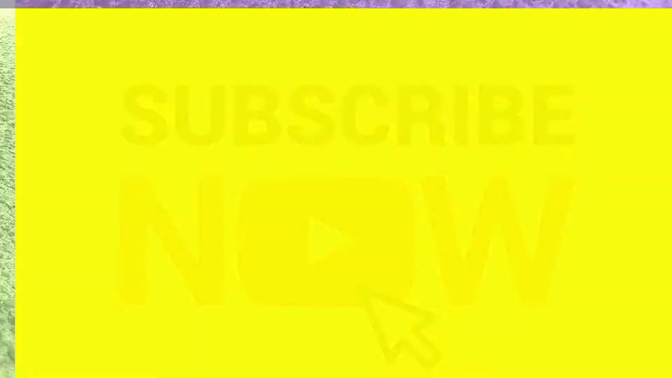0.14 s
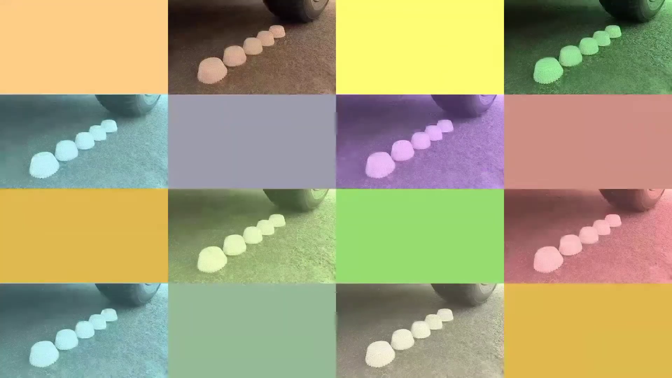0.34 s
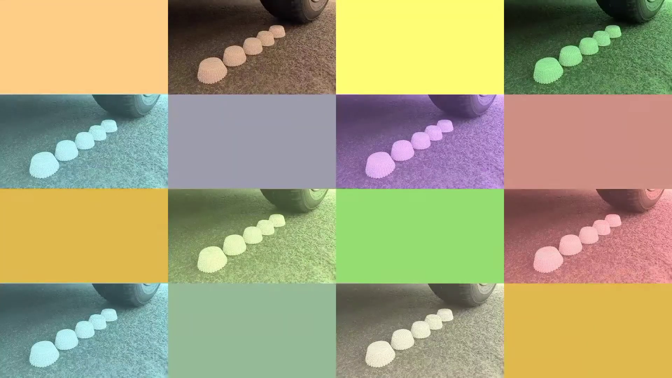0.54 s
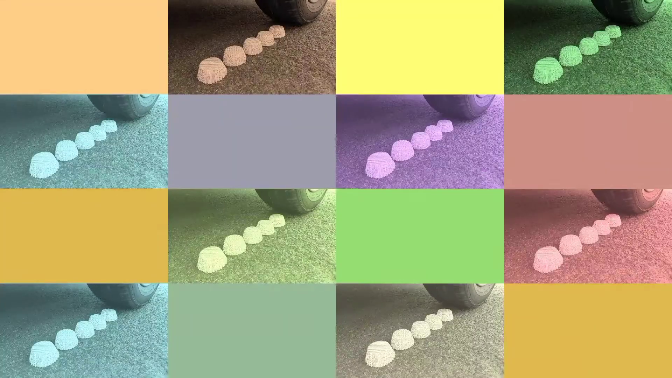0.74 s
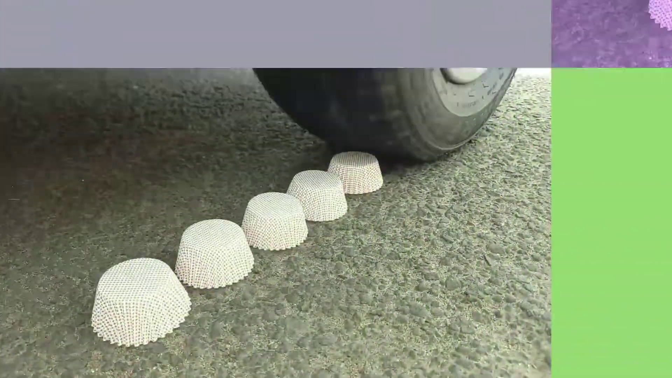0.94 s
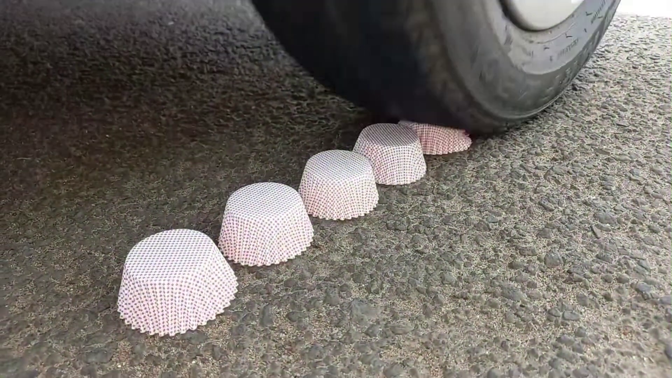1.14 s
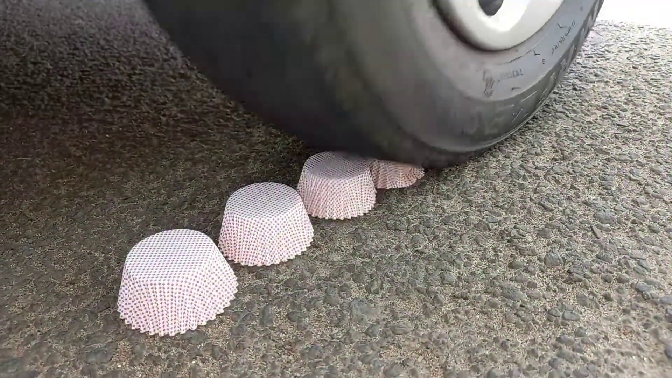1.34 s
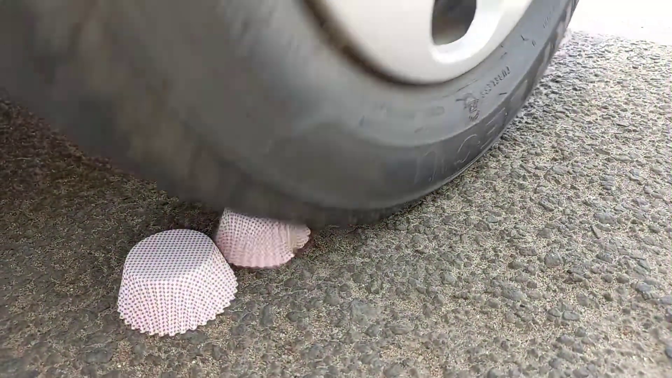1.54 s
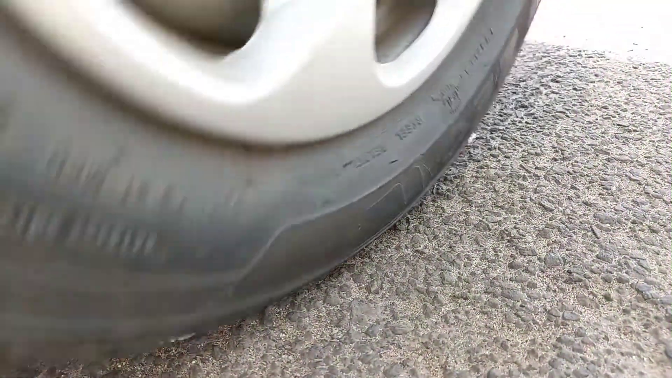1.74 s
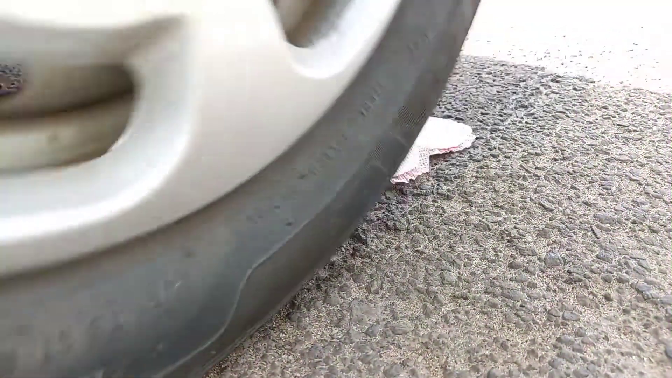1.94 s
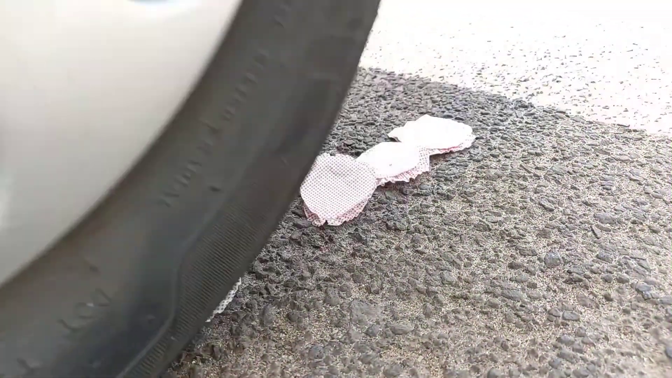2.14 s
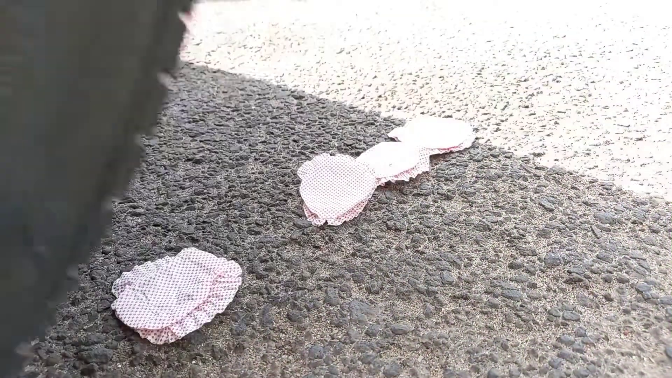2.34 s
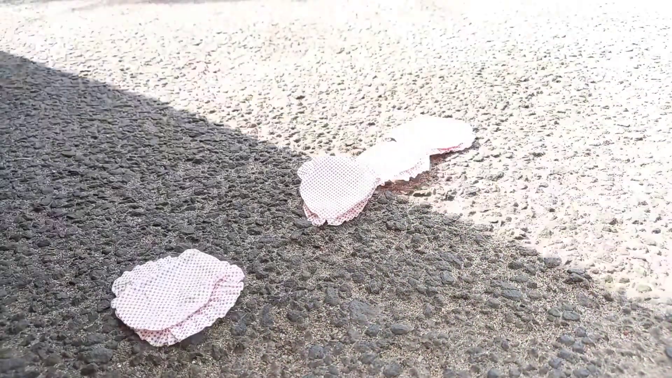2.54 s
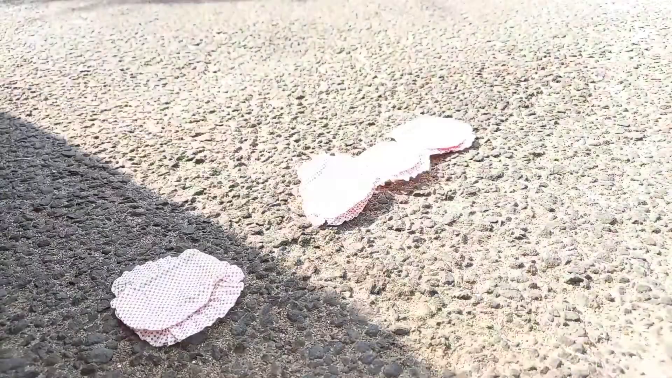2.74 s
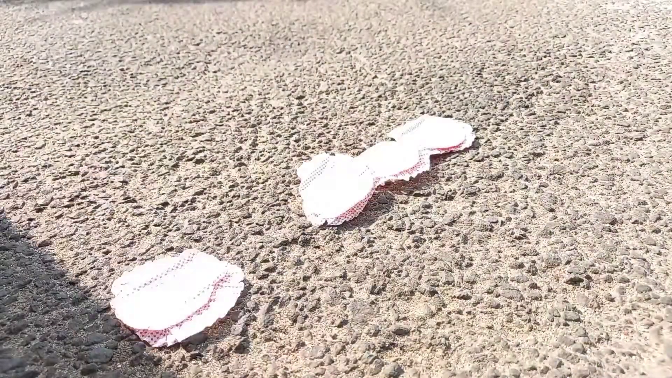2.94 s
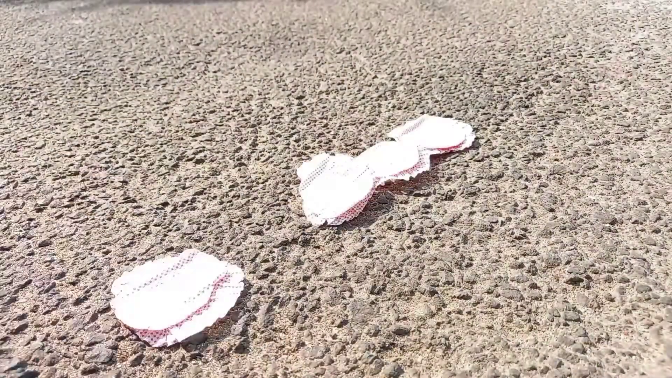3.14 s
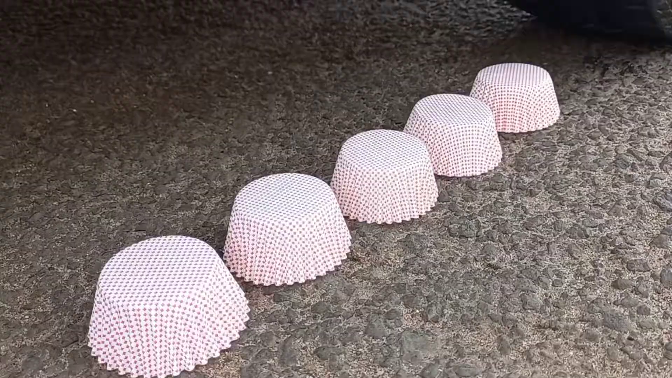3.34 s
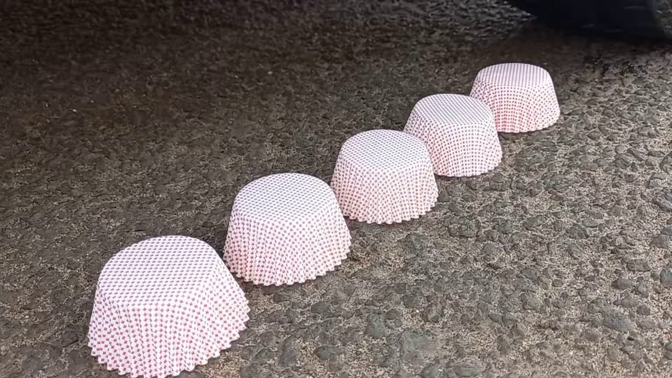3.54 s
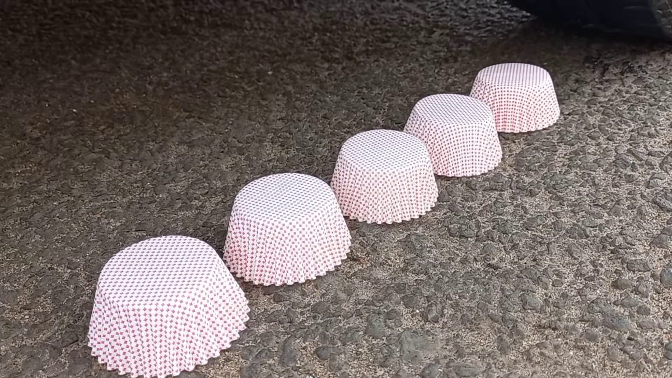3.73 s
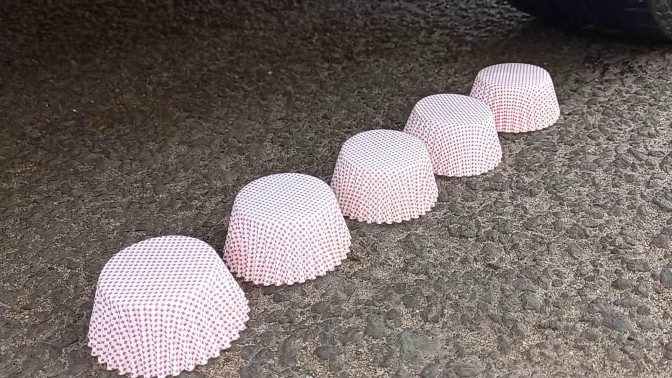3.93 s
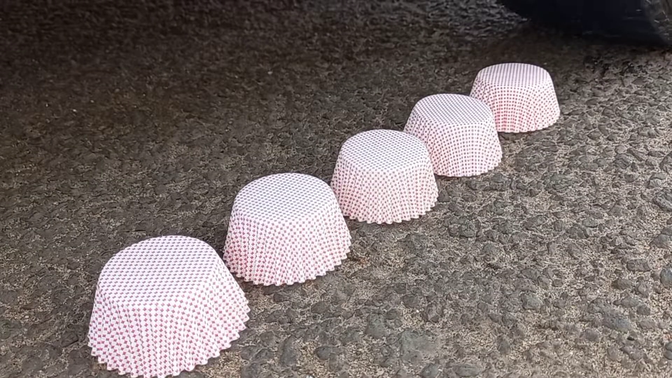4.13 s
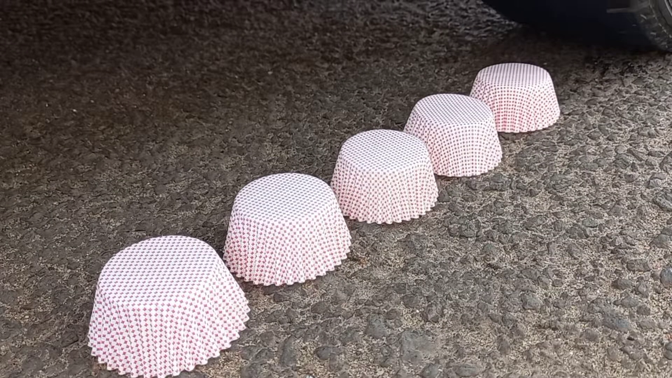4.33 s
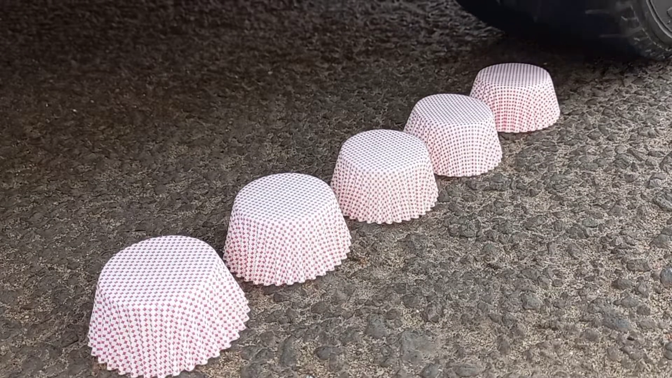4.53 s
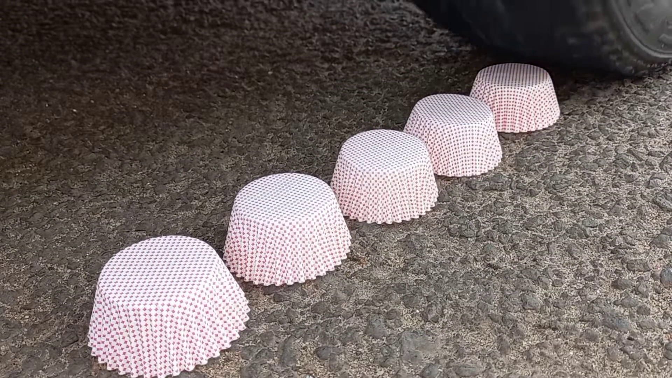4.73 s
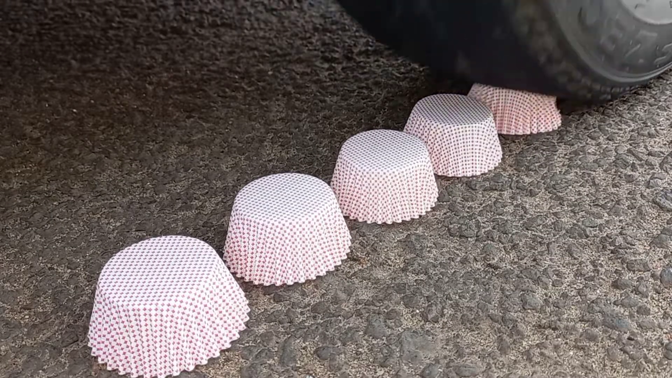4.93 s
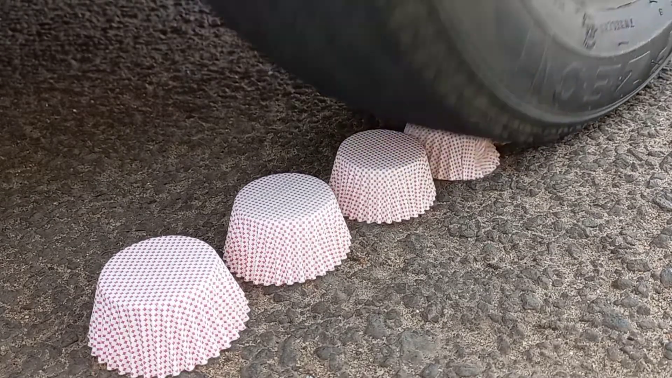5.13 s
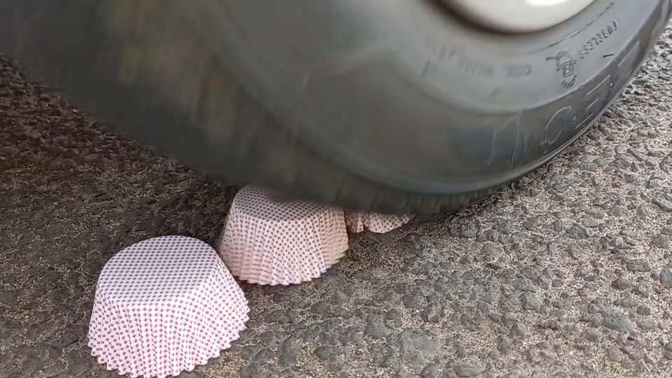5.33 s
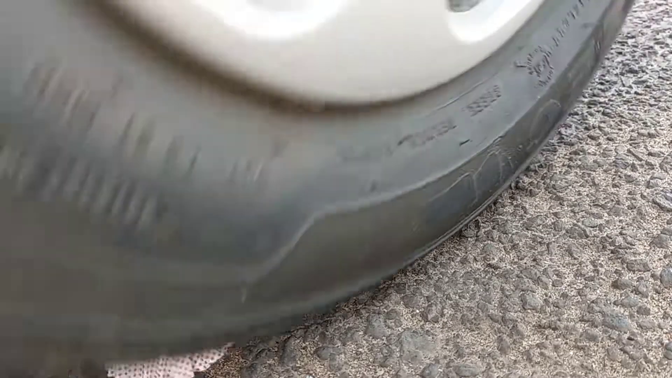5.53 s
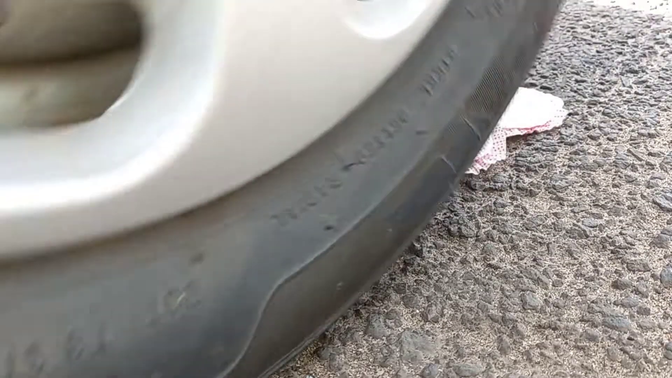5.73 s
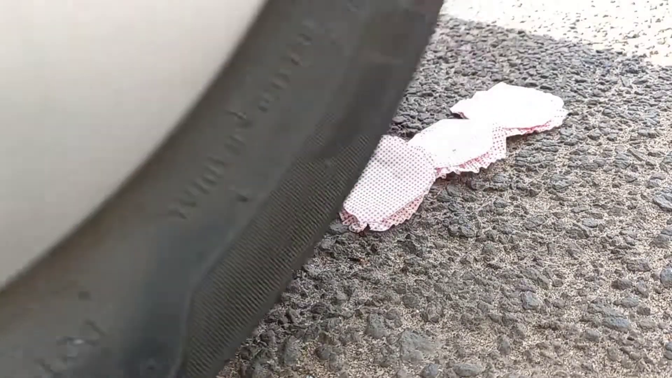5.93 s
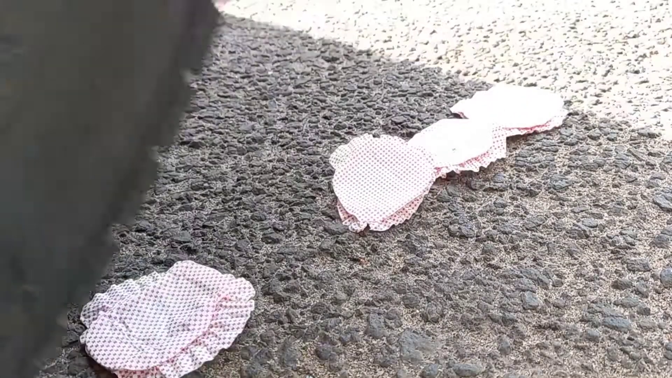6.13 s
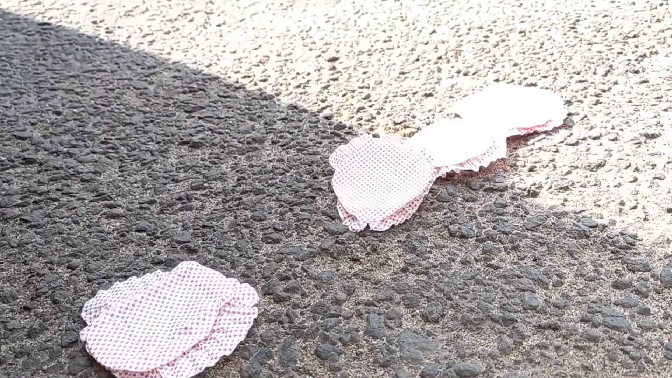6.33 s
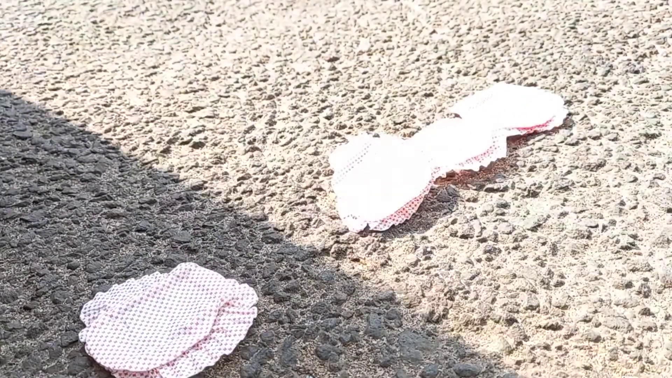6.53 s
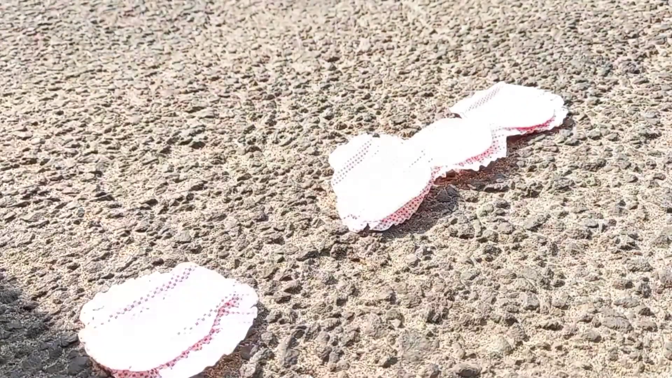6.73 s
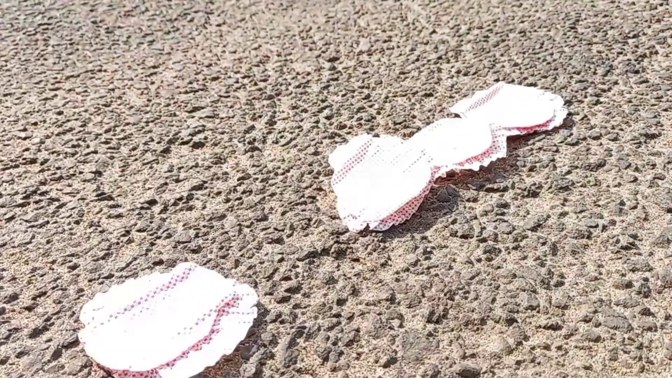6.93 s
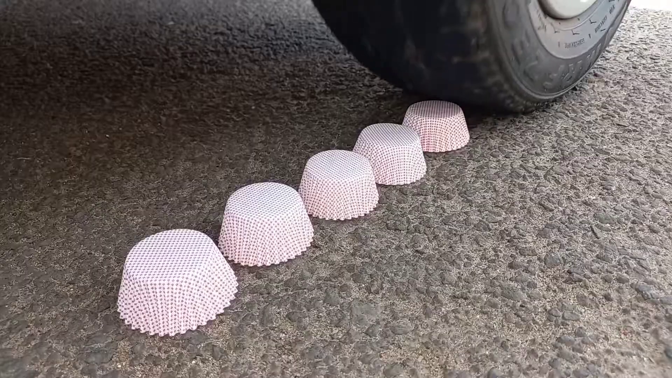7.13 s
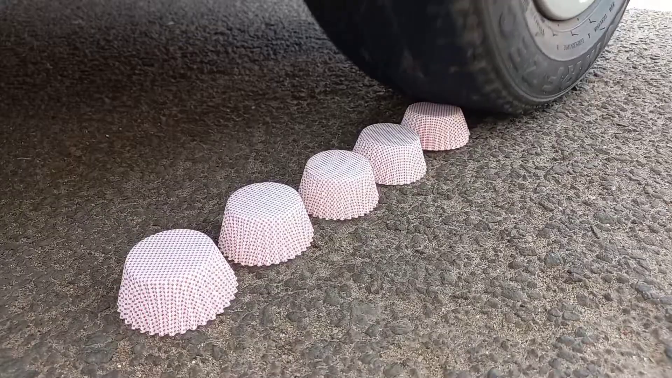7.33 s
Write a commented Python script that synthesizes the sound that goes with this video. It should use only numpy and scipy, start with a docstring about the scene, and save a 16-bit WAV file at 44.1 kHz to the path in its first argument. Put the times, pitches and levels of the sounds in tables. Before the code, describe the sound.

A creeping car flattens pleated paper cups, heard very near and dry outdoors. Sharp snaps and fibrous crackles pile up for under a second, with a dull thud inside, then grit pops sparsely as the wheel rolls off. After small thumps, a clack and a weak squeak, the crushing repeats, louder at its start. It ends abruptly quieter, with light paper ticks and low hum.

```python
"""Paper cupcake liners, five in a row on asphalt, buckle and crumple under a creeping car, heard close by.
Elastic instability makes the snaps: each pleat flips, its panel rings and its crease cracks, while
fracturing fibres excite the resonances of the paper. Grit ticks by noise bursts; the car knocks as damped
modes and filtered noise, squeaks faintly, and rolls as filtered noise with an engine hum.
The pass is heard twice, the first time fading in; then the tyre touches a fresh row."""
import sys
import numpy as np
from scipy import signal
from scipy.fft import rfft, irfft
from scipy.io import wavfile
from scipy.ndimage import map_coordinates

SR = 44100
rng = np.random.default_rng(int(sys.argv[2]) if len(sys.argv) > 2 else 0)


def output_pcm(signal):
    """Save a mono or channel-first signal as 16-bit PCM at the path in sys.argv[1].

    Samples are clipped to [-1, 1] before scaling.
    """
    pcm = np.clip(np.atleast_2d(signal).T, -1, 1) * 32767
    wavfile.write(sys.argv[1], SR, np.round(pcm).astype(np.int16))


N = 325017
TIME = np.arange(N) / SR

# Times in the tables precede the repetition in scene(); levels are relative, ahead of later gains.
# Rolling of the car: (time [s], rumble level [dB], tread hiss level [dB])
ROLLING_LEVELS = [(3.2, -59, -64), (3.6, -61.5, -69), (4.15, -62.5, -69), (4.7, -60.5, -63.5),
                  (5.3, -54.5, -70), (6.05, -54, -69), (6.3, -61, -66), (6.7, -62, -67), (7.01, -55.5, -71),
                  (7.03, -76, -81), (7.17, -70, -70), (7.37, -67, -69)]
# Engine hum, plainest as the car starts on the fresh row: (time [s], level [dB])
HUM_LEVELS = [(3.2, -69), (5.3, -63), (7.0, -68), (7.03, -83), (7.18, -59), (7.37, -61)]
# Faint squeaks of the running gear: (time [s], length [s], mid frequency [Hz], level [dB])
SQUEAKS = [(3.394, 0.26, 1644, -63.5), (4.01, 0.36, 1626, -73.5), (4.48, .38, 1308, -71),
           (7.03, .317, 1960, -78)]
# Soft knocks and scuffs:
# (time [s], boom level [dB], hollow body level [dB], rattle level [dB], shudder decay T60 [s])
KNOCKS = [(3.286, -50, -59.5, -64.5, 0.75), (3.327, -45, -43, -39, 0.011), (3.354, -66, -45.5, -55.5, 0.2),
          (3.378, -35, -47.5, -43, 0.15), (3.459, -41, -63, -60, 0.17), (3.759, -45, -77, -77, 0.23),
          (4.198, -46, -82.5, -85, .1), (4.289, -55, -39, -79, 0.2), (4.313, -46, -40.5, -81, 0.2),
          (4.337, -43, -47, -57.5, 0.13), (5.422, -28.5, -36.5, -59, 0.11),
          (5.487, -36.5, -44, -57.5, 0.14), (5.882, -63, -55, -44, 0.041), (6.306, -47, -63.5, -95, 0.4),
          (6.477, -80, -64, -59, 0.47), (6.632, -58, -80, -60, 0.045), (6.826, -47.5, -52.5, -66.5, 0.41)]
# Grit and flattened paper ticking: (time [s], level [dB], swell time constant [s])
TICKS = [(3.308, -40.5, 0.017), (3.328, -38, 0.001), (3.4, -49.5, 0.05), (3.833, -40.5, 0.012),
         (3.89, -38.5, 0.012), (3.956, -42, 0.0017), (3.97, -46.5, 0.023), (3.999, -38, .0012),
         (4.247, -43, 0.00027), (4.428, -54, .001), (4.677, -48.5, 0.0013), (5.792, -32, 0.00064),
         (5.857, -32.5, 0.0026), (5.906, -32, 0.001), (5.919, -32, 0.00083), (5.96, -39.5, .0018),
         (5.983, -38.5, 0.00083), (6.066, -54, 0.0041), (6.096, -58, .001), (6.298, -49, 0.015),
         (6.394, -38, 0.0014), (6.777, -42, 0.0034), (6.795, -48.5, 0.021), (6.825, -46, .0015)]
# Tyre pressing on paper, as a light touch, a cup giving way or a last crinkle:
# (time [s], length [s], fibre crackle level [dB], panel flutter level [dB])
PRESSES = [(4.837, 0.037, -42, -37.5), (4.882, 0.2, -29.5, -29), (5.069, .115, -22, -26),
           (5.215, .045, -20.5, -21), (5.291, .095, -21, -23), (5.427, 0.089, -21.5, -26.5),
           (5.52, .11, -20.5, -25.5), (5.807, 0.016, -40.5, -40), (7.278, .03, -46.5, -49.5),
           (7.328, .05, -48.5, -46.5)]
# Distinct snaps and crinkles of the paper:
# (time [s], panel pitch [Hz], panel level [dB], crack level [dB])
DISTINCT_PLEATS = [(4.8465, 2340, -25, -30.5), (4.8788, 1255, -23, -24.5), (4.8882, 2078, -12.5, -16),
                   (4.9353, 1608, -14, -14.5), (4.9465, 2490, -16, -14.5), (4.9583, 1594, -20, -16),
                   (4.996, 1490, -15.5, -25.5), (5.0198, 1490, -13, -15.5), (5.0511, 1407, -8.5, -18.5),
                   (5.1036, 3183, -25.5, -12), (5.1252, 2798, -12.5, -20.5), (5.1441, 3014, -26, -15),
                   (5.1589, 3293, -32.5, -15), (5.1821, 2503, -16, -17.5), (5.2206, 1661, -13, -19),
                   (5.2323, 1702, -14.5, -21.5), (5.2397, 1940, -9, -15), (5.2545, 2168, -11, -17.5),
                   (5.2954, 1720, -17, -17.5), (5.3036, 2150, -29, -11.5), (5.3312, 1474, -13.5, -15.5),
                   (5.3562, 1775, -16, -22), (5.3692, 1698, -11.5, -20), (5.382, 1560, -8.5, -14),
                   (5.3915, 1560, -11.5, -19.5), (5.4005, 1680, -13.5, -26), (5.424, 2453, -17, -13.5),
                   (5.435, 1640, -18.5, -18.5), (5.4657, 1503, -20.5, -15.5), (5.5329, 2020, -19, -16),
                   (5.5421, 1490, -12, -25), (5.5561, 2545, -17, -20), (5.5816, 2080, -14, -17.5),
                   (5.59, 1356, -11, -20.5), (5.611, 2170, -22.5, -24), (5.6365, 2500, -22, -16.5),
                   (5.6632, 3190, -30, -21.5), (5.7295, 1310, -58, -19.5), (5.766, 2260, -54, -29),
                   (5.823, 2400, -30, -34), (5.8459, 1700, -40, -33), (5.8852, 2000, -33, -34),
                   (6.0603, 2570, -44, -61), (7.304, 2210, -31, -40.5), (7.3096, 2290, -30, -36.5),
                   (7.3323, 2330, -34, -38), (7.358, 2640, -32.5, -45)]
# Bearing of the yielding paper: (time [s], lag of the left microphone [samples])
PAPER_BEARING = [(4.85, 2.1), (5.2, 0), (5.4, -3), (5.6, -8.5), (6, -9), (7.28, 2.5)]

# Spectrum of the car's rumble: (frequency [Hz], level [dB])
RUMBLE_SPECTRUM = [(15, -41.5), (28, -20), (40, -8.5), (60, -4.5), (82, 1), (120, -5.5), (200, -12.5),
                   (340, -8), (480, -13.5), (700, -21), (1050, -28), (5000, -50)]
# Spectrum of the tread hiss: (frequency [Hz], level [dB])
HISS_SPECTRUM = [(800, -6.5), (1400, 4), (2000, -0.5), (3200, -4), (5000, -2.5), (6700, 3.5), (7700, -9),
                 (15000, -9.5)]
# Spectrum of the hollow body thud: (frequency [Hz], level [dB])
HOLLOW_SPECTRUM = [(40, -23.5), (120, -1.5), (170, -2), (240, -2), (380, 0.5), (460, -5), (590, -11.5),
                   (720, -16.5), (880, -17.5), (1200, -38), (4000, -54), (12000, -72)]
# Spectrum of the rattle: (frequency [Hz], level [dB])
RATTLE_SPECTRUM = [(200, -20), (500, 3.5), (750, -0.5), (950, -5), (1250, 0.5), (1700, -5), (1960, -6.5),
                   (2300, -7.5), (4000, -22), (12000, -44)]
# Spectrum of the grit: (frequency [Hz], level [dB])
GRIT_SPECTRUM = [(300, -18.5), (1400, -8.5), (2600, -1), (4500, 0), (6700, 3.5), (8000, -4.5),
                 (12000, -0.5), (15500, -10)]
# Spectrum of the fracturing fibres: (frequency [Hz], level [dB])
FIBRE_SPECTRUM = [(200, -24), (700, -14.5), (1500, -2.5), (2800, -2.5), (4500, -2), (6700, -1.5),
                  (8300, -7.5), (12000, -1.5), (15500, -8)]
# Spectrum of the fluttering panels: (frequency [Hz], level [dB])
PANEL_SPECTRUM = [(60, -29.5), (180, -22), (400, -12.5), (800, -11), (1150, -6), (1550, 2.5), (2200, -2),
                  (3000, -2.5), (6000, -25)]
# Spectrum of the cracking creases: (frequency [Hz], level [dB])
CRACK_SPECTRUM = [(300, -18), (1500, -6), (3000, 0.5), (6500, -3), (8300, -6), (12000, -3), (15500, -4)]

PASS_END_S, REPEAT_S = 7.02, 3.78948
FADE_FROM_S, FADE_LENGTH_S = .18, 1.37
CAR_LAG = -15.5  # samples by which the left microphone lags for the car's low sounds
TOP_HZ = 15700
# A press builds, holds and lets go; the flattened paper rustles on under the tread.
PRESS_ATTACK_S, PRESS_RELEASE_S = .005, 0.056
RUSTLE_DB, RUSTLE_FALL_DB_PER_S = -14.5, 63.5
# Further pleats buckle at random; their levels are relative to the crumple around them.
PLEATS_PER_S, PLEAT_HZ, PLEAT_SPREAD_OCTAVES = 100, 1770, .38
PLEAT_PANEL_DB, PLEAT_CRACK_DB, PLEAT_SPREAD_DB = -1.5, -.5, 1.5


def amp(db):
    """Amplitude ratio of a level in decibels."""
    return 10 ** (np.asarray(db) / 20)


def unit(x):
    """Normalisation to a root mean square of 1."""
    return x / np.sqrt(np.mean(x ** 2))


def curves(table):
    """Linear interpolation of each table column at every sample."""
    s, *columns = np.transpose(table)
    return [np.interp(TIME, s, c) for c in columns]


def add(out, s, sound):
    """Superposition: mix a sound in from time s."""
    i = int(s * SR)
    part = sound[:max(N - i, 0)]
    out[i:i + len(part)] += part


def colour(x, points, size=1024):
    """Minimum-phase filtering to a given spectrum; white noise keeps its power."""
    hz, db = np.transpose(points)
    grid = np.maximum(np.arange(size // 2 + 1) * SR / size, 1)
    level_db = np.interp(np.log(grid), np.log(hz), db)
    cepstrum = irfft(np.log(amp(level_db)))
    # folding the cepstrum makes the response causal
    cepstrum[1:size // 2] *= 2
    cepstrum[size // 2 + 1:] = 0
    response = irfft(np.exp(rfft(cepstrum)))
    return signal.oaconvolve(x, response / np.linalg.norm(response))[:N]


def band(x, hz, q):
    """Resonance of a single damped oscillator."""
    return signal.lfilter(*signal.iirpeak(min(hz, SR / 2 - 1), q, fs=SR), x)


def mode(t, hz, t60):
    """Free vibration of one mode under exponential damping."""
    return np.sin(2 * np.pi * hz * t) * np.exp(-np.log(1000) * t / t60)


def burst(t, swell_s, decay_s):
    """Exponential envelope that swells up to t = 0 and dies away after it."""
    return np.exp(np.minimum(t / swell_s, -t / decay_s))


def walk(rate):
    """Slow random drift with a spread near 1, from rate random knots a second."""
    knots = rng.standard_normal(int(N / SR * rate) + 2)
    return np.interp(TIME * rate, np.arange(len(knots)), knots)


def clicks(rate, spread_db):
    """Random impulses of widely varied size, like tiny fractures: most are weak, a few strong."""
    chance, size, sign = rng.random(N), rng.standard_normal(N), rng.choice([-1, 1], N)
    return (chance < rate / SR) * sign * amp(spread_db * np.minimum(size, 2))


def microphones(x, lag):
    """Arrival-time difference: sound reaches the left microphone lag samples after the right."""
    return np.array([map_coordinates(x, [np.arange(N) + way * lag / 2], order=3) for way in (-1, 1)])


def echoes(x, db, decay_s):
    """Diffuse reflection: scattered echoes die away, different for each microphone."""
    t = TIME[:SR // 3]
    responses = rng.standard_normal((2, len(t))) * np.exp(-t / decay_s) * (t > .0005)
    return amp(db) * np.array([signal.oaconvolve(x, r / np.linalg.norm(r))[:N] for r in responses])


def rolling(side_db=-5, hum_hz=80, waver=0.0089):
    """Broadband rolling noise: correlated rumble and a common engine hum under a thin uncorrelated hiss."""
    rumble_db, hiss_db = curves(ROLLING_LEVELS)
    hum_db, = curves(HUM_LEVELS)
    mid, side = (colour(rng.standard_normal(N), RUMBLE_SPECTRUM, size=8192) for _ in range(2))
    hum_phase = 2 * np.pi * np.cumsum(hum_hz * (1 + waver * walk(36))) / SR
    hum = amp(hum_db + 2.5 * walk(9)) * np.sin(hum_phase)
    rumble = microphones(mid, CAR_LAG) + amp(side_db) * side * np.array([[1], [-1]])
    rumble *= amp(rumble_db + 2 * walk(11))
    hiss = np.array([colour(rng.standard_normal(N), HISS_SPECTRUM) for _ in range(2)])
    return rumble + hum + hiss * amp(hiss_db + 1.4 * walk(11))


def squeaks(fall=.07):
    """Friction tone, randomly modulated by rubbing, that swells, sinks in pitch and fades."""
    out = np.zeros(N)
    for s, length, hz, db in SQUEAKS:
        progress = np.clip((TIME - s) / length, 0, 1)
        phase = 2 * np.pi * np.cumsum(hz * (1 + fall * (.5 - progress))) / SR
        rub = walk(130) * np.sin(phase) + walk(130) * np.cos(phase)
        out += amp(db) * np.sin(np.pi * progress) * rub
    return out


def knocks(boom_hz=81, boom_t60=0.22, rise_s=0.0036, blow_db=16, shudder_db=1, clack_db=17,
           ring_hz=1960, ring_t60=0.1, ring_db=-3):
    """Impact response: a low boom mode, a hollow thud that shudders on, a clack that rattles and rings."""
    t = TIME[:SR // 2]
    boom, body, rattle, ring = np.zeros((4, N))
    rise = 1 - np.exp(-t / rise_s)
    blow = t == 0  # a single impulse
    for s, boom_db, body_db, rattle_db, t60 in KNOCKS:
        shudder = rise * np.exp(-np.log(1000) * t / t60) * rng.standard_normal((2, len(t)))
        pitch = ring_hz * (1 + 0.028 * rng.standard_normal())
        add(boom, s, amp(boom_db) * rise * mode(t, boom_hz, boom_t60))
        add(body, s, amp(body_db) * (amp(blow_db) * blow + amp(shudder_db) * shudder[0]))
        add(rattle, s, amp(rattle_db) * (amp(clack_db) * blow + shudder[1]))
        add(ring, s, amp(rattle_db + ring_db) * mode(t, pitch, ring_t60))
    low = amp(4.5) * boom + amp(8.5) * colour(body, HOLLOW_SPECTRUM, size=4096)
    return microphones(low, CAR_LAG) + amp(9) * colour(rattle, RATTLE_SPECTRUM) + ring


def ticks(tick_s=0.00052, trail_db=-12, settle_db=-22, settle_s=0.07):
    """Granular fracture: grit grinds under the tread, pops, trails off in smaller crackles and settles."""
    lead, trail_s = .08, .009  # seconds kept ahead of the pop; decay of the crackles
    t = TIME[:SR // 3] - lead
    force = np.zeros(N)
    for s, db, swell_s in TICKS:
        pop = burst(t, swell_s, tick_s + swell_s)
        trail = amp(trail_db) * burst(t, swell_s, trail_s)
        settling = amp(settle_db) * burst(t, swell_s + .004, settle_s)
        add(force, s - lead, amp(db) * (pop + trail + settling))
    fractures = unit(clicks(rate=6600, spread_db=7.0))
    return amp(-4.5) * colour(force * fractures, GRIT_SPECTRUM)


def crush():
    """Loading envelope: gains of fibre crackle and panel flutter, with attack, hold and release into a rustle."""
    power = np.zeros((2, N))
    for s, length, fibre_db, panel_db in PRESSES:
        held = np.maximum(TIME - s, 0)
        past = np.maximum(TIME - s - length, 0)
        rustle = amp(RUSTLE_DB - RUSTLE_FALL_DB_PER_S * past)
        release = np.maximum(np.exp(-past / PRESS_RELEASE_S), rustle)
        attack = 1 - np.exp(-held / PRESS_ATTACK_S)
        power += np.outer(amp([fibre_db, panel_db]), attack * release) ** 2
    return np.sqrt(power)


def grains(low_hz, high_hz, rate, spread_db, count):
    """Modal excitation: each tiny fracture rings its own mix of resonances, which shifts as the paper folds."""
    cracks = clicks(rate, spread_db)
    out = np.zeros(N)
    for hz in np.geomspace(low_hz, high_hz, count):
        folding = amp(2.5 * walk(35))
        mix = rng.standard_normal(N) * amp(2 * rng.standard_normal(N))
        out += band(cracks * mix * folding, hz, 3.1) / (1 + hz / 9000)
    return out


def crumple(fibre_gain, panel_gain, flurry_db=3.0):
    """Crackling noise: fibres fracture in dense flurries while the paper panels flutter."""
    flurry = amp(flurry_db * walk(160))
    fibre_grains = grains(1500, 14000, rate=3500, spread_db=5.5, count=7)
    panel_grains = grains(450, 3000, rate=800, spread_db=3.5, count=6)
    fibres = unit(colour(fibre_grains, FIBRE_SPECTRUM) * flurry)
    panels = unit(colour(panel_grains, PANEL_SPECTRUM) * flurry)
    return fibres * fibre_gain + panels * panel_gain


def random_pleats(fibre_gain, panel_gain):
    """Random buckling whose strength follows the load; rows like DISTINCT_PLEATS."""
    at = np.flatnonzero((rng.random(N) < PLEATS_PER_S / SR) & (fibre_gain > 0))
    pitch, panel, crack = np.clip(rng.standard_normal((N, 3))[at], -2, 2).T
    hz = PLEAT_HZ * 2 ** (PLEAT_SPREAD_OCTAVES * pitch)
    panel_db = 20 * np.log10(panel_gain[at]) + PLEAT_PANEL_DB + PLEAT_SPREAD_DB * panel
    crack_db = 20 * np.log10(fibre_gain[at]) + PLEAT_CRACK_DB + PLEAT_SPREAD_DB * crack
    return list(zip(TIME[at], hz, panel_db, crack_db))


def snaps(rows, rise_s=0.00016, ring_s=0.0011, crack_s=0.0011, swell_s=0.00013,
          crinkle_s=0.0025, crinkle_db=-12, delay_s=0.00033):
    """Snap-through buckling: a flipped panel rings a few cycles; its crease cracks amid a brief crinkle."""
    lead = .008  # seconds kept ahead of the flip
    t = TIME[:SR // 40] - lead
    after = np.maximum(t, 0)
    energy = SR * .0015  # that of an rms of 1 over 1.5 ms
    rise = (1 - np.exp(-after / rise_s)) ** 2
    crinkle = amp(crinkle_db) * burst(t - delay_s, crinkle_s, crinkle_s)
    tearing = burst(t - delay_s, swell_s, crack_s) + crinkle
    panels, cracks = np.zeros(N), np.zeros(N)
    for s, hz, panel_db, crack_db in rows:
        ring = -np.sin(2 * np.pi * hz * after) * rise * np.exp(-after / ring_s)
        tear = rng.standard_normal(len(t)) * tearing
        add(panels, s - lead, amp(panel_db) * ring * np.sqrt(energy / np.sum(ring ** 2)))
        add(cracks, s - lead, amp(crack_db) * tear * np.sqrt(energy / np.sum(tear ** 2)))
    return panels + amp(2.5) * colour(cracks, CRACK_SPECTRUM)


def fade_in():
    """Raised-cosine gain that rises smoothly from near silence."""
    progress = np.clip((TIME - FADE_FROM_S) / FADE_LENGTH_S, .02, 1)
    return np.sin(np.pi / 2 * progress) ** 2


def scene():
    """Superposition of direct and reflected sound: one pass, heard twice, and the start of the next."""
    pressing = crush()
    pleats = snaps(DISTINCT_PLEATS + random_pleats(*pressing))
    car = knocks() + squeaks()
    # paper and grit crackle all across the tread, so part of the sound differs between the microphones
    near, left, right = (crumple(*pressing) + ticks() for _ in range(3))
    lag, = curves(PAPER_BEARING)
    paper = microphones(pleats + amp(-3.5) * near, lag) + amp(-1.5) * np.array([left, right])
    # road and wheel reflect at once; the floor pan rings on faintly
    paper += echoes(pleats, db=-4, decay_s=.0015)
    paper += echoes(paper.mean(axis=0), db=-15, decay_s=.04)
    car = car + echoes(car.mean(axis=0), db=-11, decay_s=.015)
    balance = amp(np.array([[-.3], [.3]]))
    out = paper * balance + car + rolling()
    end, shift = int(PASS_END_S * SR), int(REPEAT_S * SR)
    first_pass, second_pass_and_next = out[:, shift:end], out[:, end - shift:]
    return np.hstack([first_pass, second_pass_and_next]) * fade_in()


def record(dry, low_cut_hz=34):
    """Band limiting and saturation: cut the deepest bass, clip the tallest peaks, then cut the top."""
    high_pass = signal.butter(4, low_cut_hz, "highpass", fs=SR, output="sos")
    clipped = np.clip(signal.sosfilt(high_pass, dry), -1, 1)
    low_pass = signal.ellip(8, .2, 70, TOP_HZ, fs=SR, output="sos")
    return signal.sosfilt(low_pass, clipped)


dry = scene()
out = record(dry)
output_pcm(out)
```